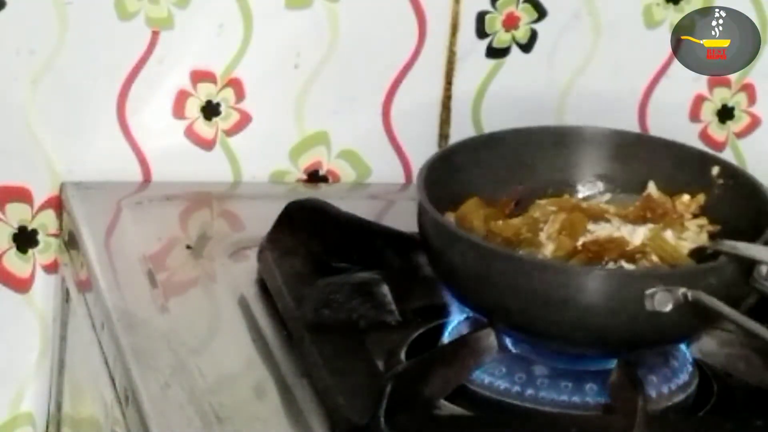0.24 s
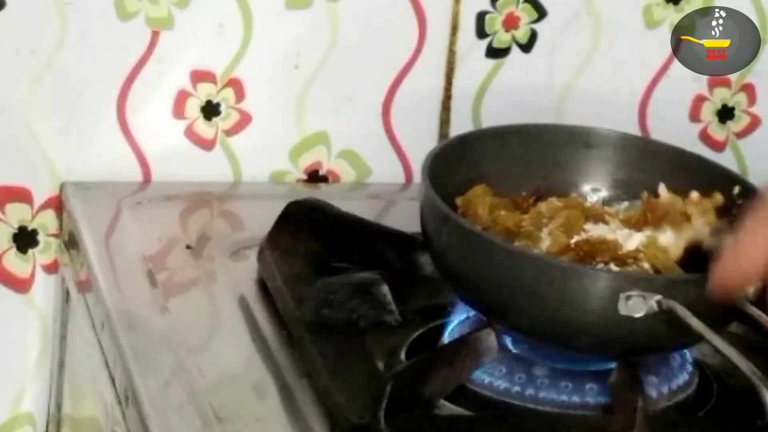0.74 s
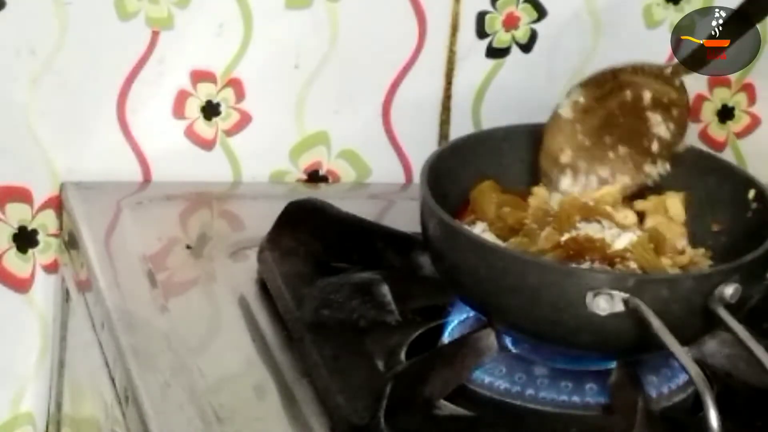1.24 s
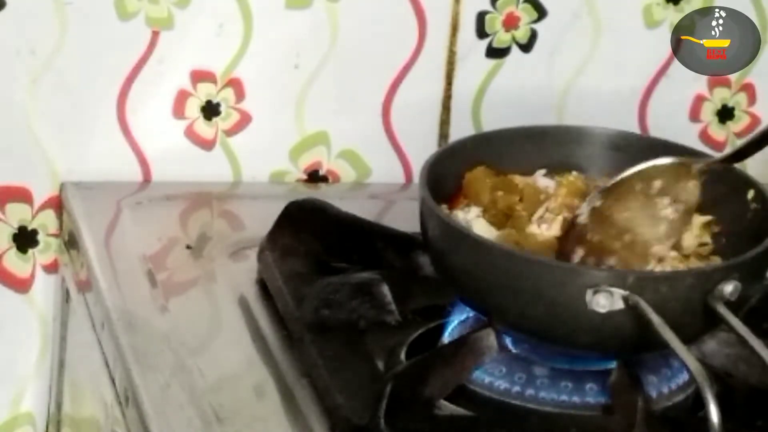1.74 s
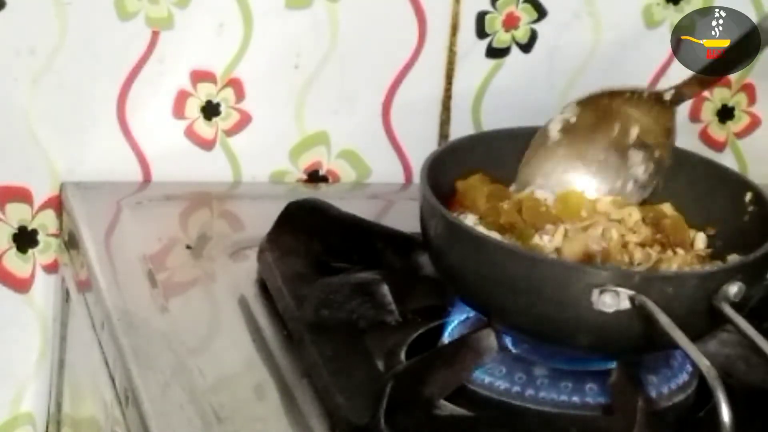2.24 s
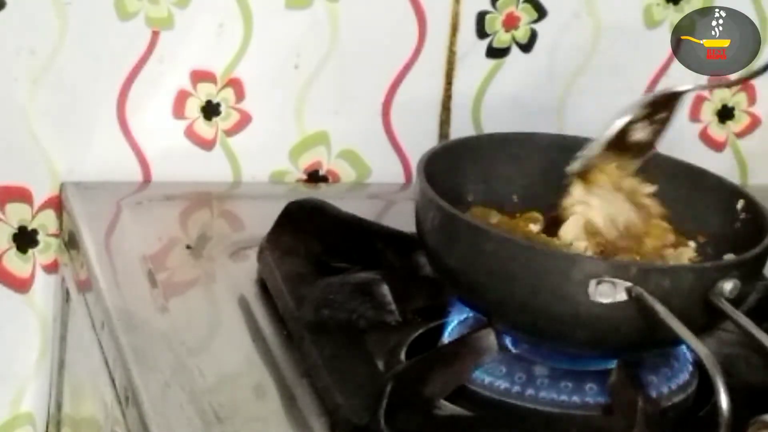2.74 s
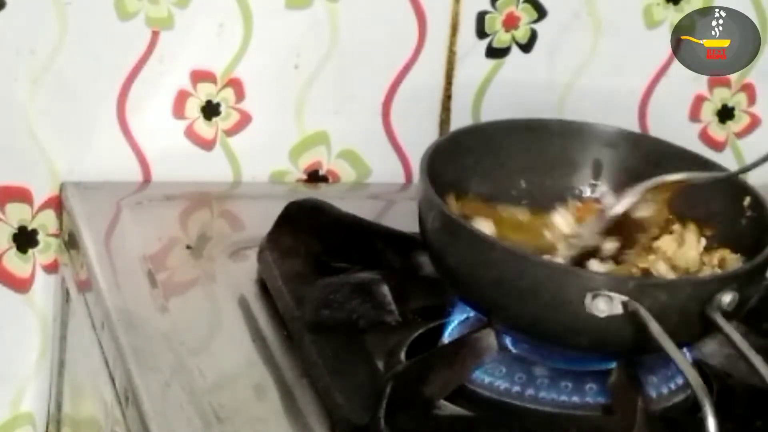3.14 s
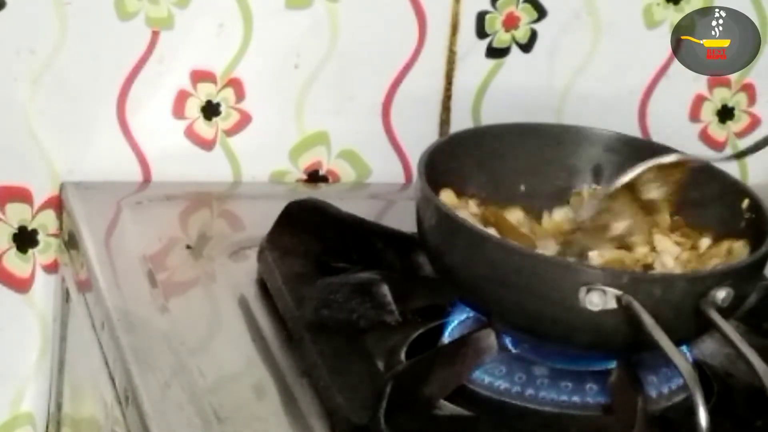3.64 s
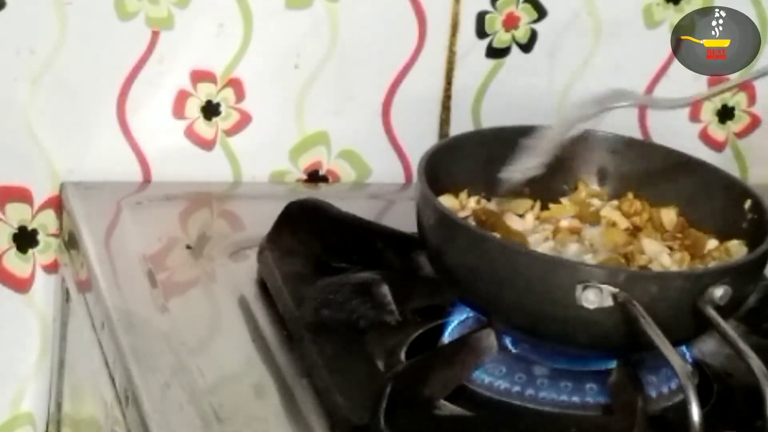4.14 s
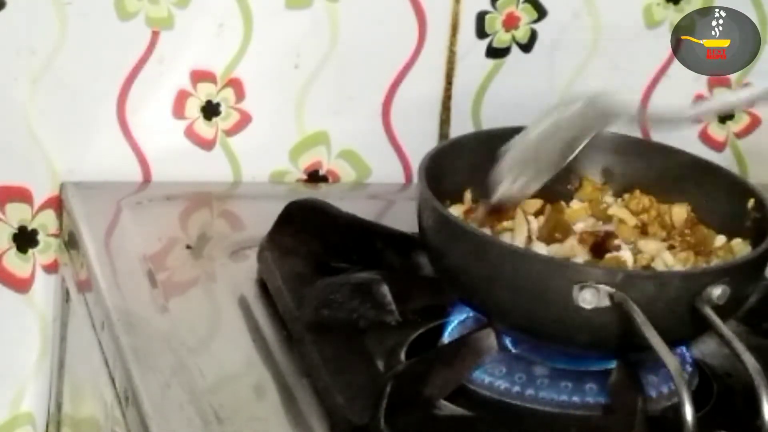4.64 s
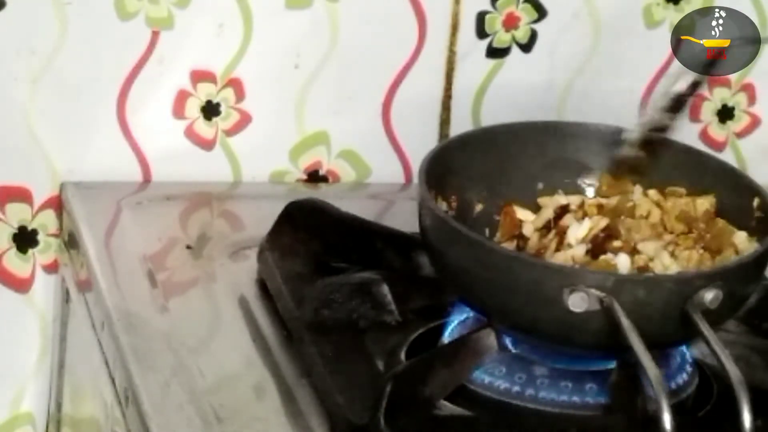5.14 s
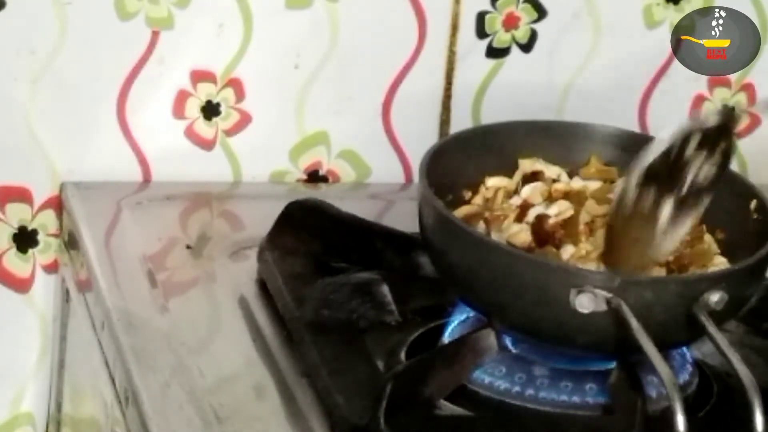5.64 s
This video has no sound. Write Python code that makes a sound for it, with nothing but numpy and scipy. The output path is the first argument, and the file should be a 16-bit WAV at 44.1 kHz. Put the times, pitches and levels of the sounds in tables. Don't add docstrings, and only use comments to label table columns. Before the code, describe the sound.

Chopped nuts and raisins fry in fat over a gas flame: a fine, uneven high crackle with sharp steam pops throughout. A steel spoon touches the pan at the start, clinks the rim near 1.8 seconds, slides around 2, hits the floor of the pan near 3.9 and the wall near 5.5. Small tiled kitchen, close stereo microphone, low rumble, and air buffeting the left channel.

```python
import sys
import numpy as np
from scipy import signal
from scipy.fft import rfft, irfft, next_fast_len
from scipy.io import wavfile
from scipy.ndimage import uniform_filter1d

SR = 44100
rng = np.random.default_rng(int(sys.argv[2]) if len(sys.argv) > 2 else 0)


def amp(db):
    return 10 ** (np.asarray(db, float) / 20)


def write(x):
    x = np.atleast_2d(x).T
    wavfile.write(sys.argv[1], SR, np.round(np.clip(x, -1, 1) * 32767).astype(np.int16))


N = 260190

# start_s, peak_db, pitch_hz, direct_view_db
BURSTS = [(0.053, -27, 11600, 2), (0.0606, -41, 6500, 20), (2.159, -34, 6700, 2.5), (0.494, -27, 11400, -8),
          (0.85, -29.5, 10200, 4.5), (0.8575, -19.5, 9500, -9), (4.1548, -27.5, 11100, 7),
          (1.05, -28, 9200, 6), (1.1832, -22.5, 8700, 1), (1.29, -23, 12000, 2), (1.5433, -30, 9800, 1.5),
          (1.549, -40, 8600, 0), (1.556, -33, 9700, -2), (1.7886, -24.5, 9900, 0),
          (1.8154, -11, 10300, -6.5), (2.18, -32, 11700, -1), (2.5713, -19.5, 10700, -2.5),
          (2.63, -26.5, 12100, -4), (2.747, -24, 12200, -7), (2.9541, -21.5, 10400, -2),
          (3.2292, -26.5, 10800, -10), (3.303, -19.5, 11300, -1.5), (3.45, -24.5, 11900, -6),
          (3.502, -31, 12300, 0), (3.507, -29, 12100, 1), (3.609, -30, 11500, 2),
          (3.6179, -22.5, 12300, -1.5), (3.4328, -36.5, 11700, 4.5), (3.8265, -26, 10400, 6),
          (3.8652, -16, 8400, -8), (4.032, -26, 11800, -8), (5.1249, -26.5, 10400, -3),
          (5.527, -14.5, 11600, -3)]
# start_s, peak_db, pitch_hz
SPITS = [(0.2137, -31.5, 10100), (0.2182, -30.5, 9400), (0.372, -34, 9400), (0.5167, -45, 5170),
         (0.55, -33, 10500), (0.734, -46, 11400), (0.81, -44, 10900), (0.8588, -32, 10250),
         (1.4017, -35.5, 7700), (1.731, -33, 10000), (1.938, -33.5, 7900), (0.0905, -25, 8950),
         (2.2605, -32, 9100), (2.3914, -34, 9000), (2.4384, -53, 11800), (2.7297, -29, 13600),
         (3.049, -31.5, 8740), (3.1433, -30.5, 11600), (3.69, -32.5, 9000), (3.5804, -35.5, 8600),
         (3.8015, -32, 9150), (3.987, -37.5, 7050), (4.273, -37, 11500), (4.438, -35, 11300),
         (4.609, -34, 8900), (5.1, -31.5, 11600), (5.329, -33.5, 11400), (1.015, -31, 11300),
         (5.7, -34, 11700), (5.781, -31, 13000),
         (0.318, -45.5, 4530), (0.36, -42.5, 4560), (0.4123, -37.5, 8000), (.451, -42, 5260),
         (.645, -47, 8430), (0.68, -38, 12700), (1.0133, -38.5, 5830), (1.68, -37, 8650),
         (2.779, -38.5, 5720), (2.851, -39, 8800), (2.9163, -51, 11900), (3.073, -33, 11700),
         (3.175, -41, 11600), (3.698, -37, 8600), (3.786, -40, 9780), (4.107, -51, 1880),
         (4.135, -40, 9600), (4.353, -49, 10500), (4.4088, -55, 1470), (4.536, -48, 8900),
         (4.5441, -52.5, 1880), (4.566, -42, 12000), (4.579, -36, 12300), (4.6936, -49, 3630),
         (4.819, -46, 10100), (4.8653, -49, 10500), (4.8814, -46, 8200), (4.9098, -42, 10000),
         (5.0443, -61, 2000), (5.247, -46.5, 3900), (1.5987, -47, 3900), (1.438, -53, 2500),
         (5.254, -37.5, 9100), (5.293, -37.5, 10500), (5.3876, -50.5, 6250), (5.435, -39.5, 11400),
         (5.515, -38, 10200), (5.858, -43, 10900)]
# start_s, peak_db, pitch_hz, length_cycles
PLOPS = [(0.069, -34.5, 5260, 4.8), (0.1047, -25.5, 8360, 2.7), (0.3974, -41, 3140, 1.3),
         (5.765, -46, 6000, 2), (0.1106, -34, 3400, 1.7), (0.1217, -32, 5230, 3.5),
         (0.5216, -30.5, 4340, 1), (0.5648, -40.5, 2290, 2.9), (0.806, -37.5, 3940, 2),
         (0.8736, -25.5, 3130, 0.84), (1.391, -47.5, 1810, 3.1), (1.5139, -34.5, 3580, 1.3),
         (1.5425, -42, 4260, 4), (1.6642, -36, 3320, 1.3), (2.2592, -49, 2630, 1.9),
         (2.3657, -43, 2560, 1.5), (2.4173, -40, 1590, 1.6), (3.1422, -39.5, 2820, 0.93),
         (3.5656, -47.5, 1580, 1.3), (0.94, -41.5, 3280, 2), (4.258, -43.5, 1510, 0.88),
         (4.629, -40.5, 2980, 1.35), (4.7018, -32, 8300, 5.4), (5.203, -58, 3150, 2.9)]
BURST_CYCLES, CYCLES_PER_DB, BURST_REF_DB = 1.465, 0.0568, -20
SPIT_VIEW_DB, PLOP_VIEW_DB = 0.5, 1.5
STRAY_COUNT, STRAY_DB, STRAY_SPAN_DB, STIR_REF_DB = 260, -48.5, 5, -55.5

# time_s, boil_db, stir_db
FRY_LEVELS = [(0.05, -50.5, -58.5), (0.31, -51.5, -61.5), (0.55, -53, -59.5), (0.92, -48.5, -67),
              (1.28, -56.5, -61), (1.53, -49.5, -56.5), (1.76, -47.5, -62), (1.95, -48.5, -53.5),
              (2.25, -49, -61.5), (3.32, -55.5, -62.5), (3.75, -49.5, -64), (4.2, -57, -67),
              (4.42, -56, -69), (4.65, -56, -69), (4.98, -59, -66.5), (5.2, -56, -62.5), (5.55, -57, -69.5),
              (5.9, -48.5, -62)]
# freq_hz, level_db
SIZZLE_SPECTRUM = [(4000, -59), (6500, 0), (8500, 3.5), (11000, 5.5), (13500, 2), (16000, 3)]
# freq_hz, level_db
BUBBLING_SPECTRUM = [(700, 0), (1200, 1), (2000, 7), (3500, 3.5), (6000, 4), (9000, -32)]
FLUTTER_DB, FLUTTER_S, PATCH_DB = 2.5, 0.017, 2.5

PAN_HZ = [233, 314, 379, 428, 493, 561, 609, 668, 705, 817, 1071, 1195, 1329, 1394, 1453, 1757, 1925, 2060,
          2257, 2520, 3120, 3478]
# width_hz, rim_db, floor_db, wall_db
PAN_MODES = [(17.9, -37, -9, -14), (33.8, 6, -4, -25), (32.1, 9, -1.5, -5), (32.3, 8.5, -9, -3.5),
             (20, -1.5, -10.5, -17), (24.8, -10, -3, -22), (24.3, 3, -5.5, -6.5), (30.2, 2.5, -4, -2.5),
             (36.7, 2, -5, 0.5), (20, -22, -27, -10), (34.5, -9.5, -14, -19.5), (34.8, -16, -8.5, -16),
             (35, -22, -14, -23), (20.3, -13.5, -23, -12), (24.7, -12.5, -29, -11), (35.4, -11, -18, -14.5),
             (41, -18, -15, -8), (50.5, -8, -13, -15.5), (49.3, -23.5, -28, -28), (61.5, -23, -27, -14),
             (79, -2.5, -11, -10), (49.4, -8, -15, -30)]
SPOON_HZ = [3930, 4061, 4274, 4643, 5130, 5420, 6255, 6535, 6826, 7240, 7465, 8014, 8093, 8695, 8958, 9668,
            9848, 10028, 10540, 10880, 11320, 11704, 11900, 12394, 12600, 13600]
# width_hz, rim_db, floor_db, wall_db
SPOON_MODES = [(34, -15.5, -14, -7.5), (40.4, -9.5, -16.5, -32), (40.5, -10, -13, -29),
               (30.4, -23, -21, -12.5), (41.5, -39, -17, -18), (41, -16, -15, -17), (60, -29, -26, -8.5),
               (60, -1, -19, -19), (50.3, -26, -17, -38), (49.7, -35, -23, -28), (50, -17, -25, -12),
               (49.7, -20, -10, -18.5), (39.5, -19, -7.5, -33), (50, -28, -16, -12), (60, -26, -24, -10),
               (40, -25, -21, -20), (30, -2.5, -20, -17.5), (30, -4, -19, -22), (61.4, -7, -12, -12),
               (60, -22, -5, -21), (79, -20, -13, -21), (40.4, -21, -14, -12), (50.4, -30, -19, -23),
               (50.7, -41, -20, -20), (80, -21, -14, -24), (100, -16, -2, -26)]
# start_s, blow_db, drag_s, drag_db, tilt_db_per_octave
KNOCKS = [
    [(.075, -40.5, 0.016, -8, -0.5), (1.8148, -34, 0.041, -27, 1.7), (1.846, -38, 0.011, -34, 3),
     (1.939, -50.5, 0.054, -21, 3), (2.055, -51, 0.04, -25, -1)],
    [(.24, -63, 0.015, -31, -10), (3.52, -44, 0.077, -21.5, -4), (3.8636, -27.5, 0.011, -33, 0.55),
     (3.938, -41, 0.024, -16.5, -0.5)],
    [(4.435, -41.5, 0.036, -14, -1.5), (4.51, -49.5, 0.022, -14, -3), (5.5268, -28.5, 0.061, -18.5, 1),
     (5.566, -36.5, 0.049, -5, 0.5)],
]
# freq_hz, level_db
CLATTER_SPECTRUM = [(150, -38), (300, -5), (700, -1), (1100, -8.5), (3000, -11), (6000, -17.5),
                    (10000, -19), (15000, -14)]
RISE_CYCLES, HARDNESS_SHARE, HARD_DB = 6, 0.39, -28
THUD_HZ, THUD_RISE_S, THUD_FALL_S, THUD_DB = 980, 0.021, 0.0087, -1.5
RING_IN_ROOM_DB = -6.5

# start_s, end_s, freq_hz, width_hz, level_db
SLIDES = [(1.965, 2.073, 3720, 360, -52.5), (2.005, 2.12, 1450, 250, -61), (0.56, 0.62, 1950, 450, -61),
          (0.875, 0.985, 2250, 3500, -54), (1.512, 1.625, 3700, 2200, -60.5),
          (4.62, 4.68, 2840, 900, -61.5), (0.515, 0.522, 4400, 1500, -57), (0.805, 0.85, 3240, 1200, -62),
          (2.415, 2.46, 1600, 820, -64.5), (1.585, 1.65, 790, 450, -60), (1.94, 2.11, 3400, 4700, -57.5),
          (3.52, 3.6, 1770, 1400, -60.5)]
SLIDE_RISE_S, SLIPS_PER_S = 0.0096, 2100

# delay_s, level_db
BOUNCES = [
    (0, 1.5),
    (.0005, -14),
    (.001, -25.5),
    (.0016, -3.5),
]
# delay_s, level_db
ECHOES = [
    (.0058, -9),
    (.0083, -11),
    (.0127, -11),
]
# freq_hz, t60_s
ROOM_DECAY = [(200, 0.41), (1000, 0.36), (5000, 0.33), (14000, 0.29)]
SCATTER_DB, SCATTER_S = -4, 0.002

# time_s, wind_db
GUSTS = [(0.0, -26), (0.06, -27), (0.8, -24), (0.84, -25.5), (1.97, -25.5), (2.12, -22), (2.15, -27),
         (3.55, -25), (3.73, -25.5), (3.81, -26), (5.62, -25.5), (5.9, -28)]
# freq_hz, level_db
WIND_SPECTRUM = [(3, -0.5), (8, -0.5), (14, 4), (30, -5.5), (60, -13), (120, -25), (250, -37.5), (500, -51),
                 (1500, -69.5)]
# freq_hz, level_db
RUMBLE_SPECTRUM = [(10, 16), (40, 6.5), (120, -25), (300, -10.5), (600, -17.5), (1000, -23.5),
                   (2000, -30.5)]
# freq_hz, width_hz, level_db
FAN_TONES = [
    (20.2, 2.8, -52.5),
    (92.3, 8.9, -76),
    (155.5, 3.9, -72),
]
RUMBLE_DB, SETTLE_DB, SETTLE_S = -47.5, 12, 0.23
# freq_hz, gain_db
CAPSULE = [(5000, -0.5), (8000, -0.5), (10500, 1.5), (13000, 2), (15200, -6), (17000, -18)]


def evened(x):
    return x / np.sqrt(np.mean(x ** 2) + 1e-20)


def read(points, hz):
    f, value = np.transpose(points)
    return np.interp(np.log(hz + 1), np.log(f + 1), value)


def curve(rows, column):
    rows = np.array(rows)
    return amp(np.interp(np.arange(N) / SR, rows[:, 0], rows[:, column]))


def coloured(x, points):
    size = next_fast_len(N)
    gain = amp(read(points, np.fft.rfftfreq(size, 1 / SR)))
    return evened(irfft(rfft(x, size) * gain, size)[..., :N])


def smoothed(x, span):
    return uniform_filter1d(uniform_filter1d(x, span), span)


def add(mix, start_s, sound):
    part = mix[max(round(start_s * SR), 0):][:len(sound)]
    part += sound[:len(part)]


def kitchen():
    a, b = rng.standard_normal((2, N))
    t = np.arange(N) / SR
    level = amp(RUMBLE_DB + SETTLE_DB * np.exp(-(t / SETTLE_S) ** 2))
    out = level * coloured(np.array([a, .5 * a + 0.58 * b]), RUMBLE_SPECTRUM)
    for hz, width_hz, db in FAN_TONES:
        r = np.exp(-np.pi * width_hz / SR)
        waver = rng.standard_normal(N) + 1j * rng.standard_normal(N)
        for _ in range(2):
            waver = signal.lfilter([1], [1, -r], waver)
        out = out + amp(db) * evened((waver * np.exp(2j * np.pi * hz * t)).real)
    return out


def wind():
    eddies = coloured(rng.standard_normal(N), WIND_SPECTRUM)
    level = np.sqrt(smoothed(eddies ** 2, 4000))
    return amp(np.array([[6.5], [-34]])) * curve(GUSTS, 1) * eddies / level ** 0.32


def room_answer(tail_db):
    size = 2 * SR // 5
    taps = np.zeros((2, size))
    at = np.arange(100, size - 12, 12) + rng.integers(0, 12, (2, (size - 101) // 12))
    np.put_along_axis(taps, at, rng.choice([-1., 1.], at.shape), 1)
    taps[1] += 0.57 * signal.filtfilt(*signal.butter(2, 750 / (SR / 2)), taps[0] - taps[1])
    hz, t, z = signal.stft(taps, SR, nperseg=256)
    decay = amp(-60 * t / read(ROOM_DECAY, hz)[:, None])
    tail = signal.istft(z * decay, SR, nperseg=256)[1][:, :size]
    tail = tail * np.clip((np.arange(size) / SR - .002) / 0.0063, 0, 1)
    out = amp(tail_db) * tail / np.linalg.norm(tail, axis=1, keepdims=True)
    for delay_s, db in ECHOES:
        out[[0, 1], round(delay_s * SR) + rng.integers(-40, 40, 2)] += amp(db)
    return out


def room(direct, x, tail_db, count=3):
    (_, direct_db), *bounces = BOUNCES
    turn = np.pi * 2.3 * np.arange(N) / SR
    out = amp(direct_db + np.array([[-1.3], [0]])) * direct
    for k in range(count):
        share = np.sqrt(2 / count) * np.cos(turn + np.pi * k / count)
        scatter = rng.standard_normal((2, 500)) * np.exp(-np.arange(500) / SR / SCATTER_S)
        near = amp(SCATTER_DB) * scatter / np.linalg.norm(scatter, axis=1, keepdims=True)
        for delay_s, db in bounces:
            near[[0, 1], round(delay_s * SR) + rng.integers(0, 24, 2)] += amp(db - 2.5)
        out = out + signal.oaconvolve((direct * share)[None], near, axes=1)[:, :N]
        out = out + signal.fftconvolve((x * share)[None], room_answer(tail_db), axes=1)[:, :N]
    return out


def spoon_slides():
    out = np.zeros(N)
    t = np.arange(SR // 6) / SR
    for start_s, end_s, hz, width_hz, db in SLIDES:
        r = np.exp(-np.pi * width_hz / SR)
        slips = rng.standard_normal(len(t)) * (rng.random(len(t)) < SLIPS_PER_S / SR)
        for _ in range(2):
            slips = signal.lfilter([1, 0, -1], [1, -2 * r * np.cos(2 * np.pi * hz / SR), r ** 2], slips)
        fade = np.sqrt(np.clip(1 - t / (end_s - start_s), 0, 1))
        add(out, start_s, amp(db) * evened(slips) * np.minimum(t / SLIDE_RISE_S, 1) * fade)
    return out


def spoon_knocks():
    (ring, clatter), t = np.zeros((2, N)), np.arange(SR // 3) / SR
    hz = np.array(PAN_HZ + SPOON_HZ)[:, None]
    width_hz, *place_db = np.array(PAN_MODES + SPOON_MODES).T[:, :, None]
    bins_hz = np.fft.rfftfreq(len(t), 1 / SR)
    low = 1 / (1 + (bins_hz / THUD_HZ) ** 4)
    rise = np.minimum(t / 0.0039, 1)
    swell = np.sin(np.pi / 2 * np.minimum(t * hz / RISE_CYCLES, 1)) ** 2
    short_fall = rise * np.exp(-t / 0.0027)
    thud_fall = np.minimum(t / THUD_RISE_S, 1) ** 2 * np.exp(-t / THUD_FALL_S)
    for rows, mode_db in zip(KNOCKS, place_db):
        for start_s, db, drag_s, drag_db, tilt_db in rows:
            phase = 2 * np.pi * rng.random(hz.shape)
            gain = amp(mode_db + HARDNESS_SHARE * (db - HARD_DB) + tilt_db * np.log2(hz / 700))
            modes = swell * gain * np.exp(-np.pi * width_hz * t) * np.sin(2 * np.pi * hz * t + phase)
            grit = rng.standard_normal(len(t)) * (rng.random(len(t)) < .02)
            grit = grit * np.clip((drag_s - t) / 0.024, 0, 1)
            force = amp(drag_db) * grit + (t == 0)
            shaken = np.sqrt(abs(signal.fftconvolve(force ** 2, short_fall)[:len(t)]))
            thud = amp(THUD_DB) * np.sqrt(abs(signal.fftconvolve(force ** 2, thud_fall)[:len(t)]))
            hiss = rng.standard_normal(len(t))
            colour = amp(read(CLATTER_SPECTRUM, bins_hz) + tilt_db * np.log2((bins_hz + 1) / 700))
            rattle = irfft((rfft(hiss * shaken) * (1 - low) + rfft(hiss * thud) * low) * colour, len(t))
            add(ring, start_s, amp(db + 1.5) * signal.fftconvolve(force, rise * modes.sum(axis=0))[:len(t)])
            add(clatter, start_s, amp(db + 13.0) * rattle)
    return ring, clatter


def crackle(points, per_s, spread_db):
    size = amp(spread_db * np.minimum(rng.exponential(1, N), 3.5)) * rng.choice([-1, 1], N)
    return coloured(size * (rng.random(N) < per_s / SR), points)


def patchy(x):
    z = signal.stft(x, nperseg=256)[2]
    patches = uniform_filter1d(rng.standard_normal(z.shape), size=9, axis=0)
    patches = evened(uniform_filter1d(patches, size=8, axis=1))
    return signal.istft(z * amp(PATCH_DB * patches), nperseg=256)[1][:N]


def sizzle():
    fine = amp(-7.5) * curve(FRY_LEVELS, 1) * crackle(SIZZLE_SPECTRUM, 1500, 2.0)
    deep = amp(-4.0) * curve(FRY_LEVELS, 2) * crackle(BUBBLING_SPECTRUM, 700, 4.0)
    surges = evened(smoothed(rng.standard_normal(N), round(FLUTTER_S * SR)))
    return patchy((fine + deep) * amp(FLUTTER_DB * surges))


def bubble_pops():
    direct, out = np.zeros((2, N))
    when, size, pitch, view = rng.random((STRAY_COUNT, 4)).T
    when_s = when * N / SR
    stirred_db = np.interp(when_s, *np.array(FRY_LEVELS).T[::2]) - STIR_REF_DB
    stray_db = STRAY_DB + STRAY_SPAN_DB * size ** 2 + stirred_db * (1 - pitch)
    stray_hz = 2500 * 5.57 ** np.sqrt(pitch)
    strays = np.transpose([when_s, stray_db, stray_hz, 2.7 + 0 * size, -4.0 + 15.1 * view])
    bursts = BURSTS + [(*row, SPIT_VIEW_DB) for row in SPITS]
    bursts = [(start_s, db, hz, BURST_CYCLES + CYCLES_PER_DB * (BURST_REF_DB - db), view_db)
              for start_s, db, hz, view_db in bursts]
    plops = [(*row, PLOP_VIEW_DB) for row in PLOPS]
    for start_s, db, hz, cycles, view_db in [*bursts, *plops, *strays]:
        u = np.arange(500) * hz / SR / (0.41 * cycles)
        ring = np.sin(2 * np.pi * 0.41 * cycles * u) * u ** 2 * np.exp(2 - 2 * u)
        puff = u ** 2 * np.exp(-2 * u)
        ring -= puff * ring.sum() / puff.sum()
        ring[:3] += 0.091 * np.array([1, -1.5, .5])
        add(out, start_s, amp(db + 4.5) * ring)
        add(direct, start_s, amp(db + 2.0 + view_db) * ring)
    return np.array([direct, out])


def scene():
    buried = amp(np.array([[-3.5], [0]]))
    frying = room(*(buried * sizzle() + bubble_pops()), 3.25)
    ring, clatter = spoon_knocks()
    spoon = ring + clatter + spoon_slides()
    stirring = room(amp(-3.5) * spoon, spoon - (1 - amp(RING_IN_ROOM_DB)) * ring, 2.8)
    return frying + stirring + kitchen() + wind()


def roll_off(x):
    return signal.sosfilt(signal.butter(12, 16520, fs=SR, output="sos"), x)


def record(dry):
    edge = 4096
    running = np.pad(dry, ((0, 0), (edge, edge)), "reflect")
    size = next_fast_len(running.shape[1])
    response = amp(read(CAPSULE, np.fft.rfftfreq(size, 1 / SR)))
    heard = irfft(rfft(running, size) * response, size)[:, edge:edge + N]
    ceiling = .5
    return roll_off(ceiling * np.tanh(heard / ceiling))


dry = scene()
out = record(dry)
write(out)
```